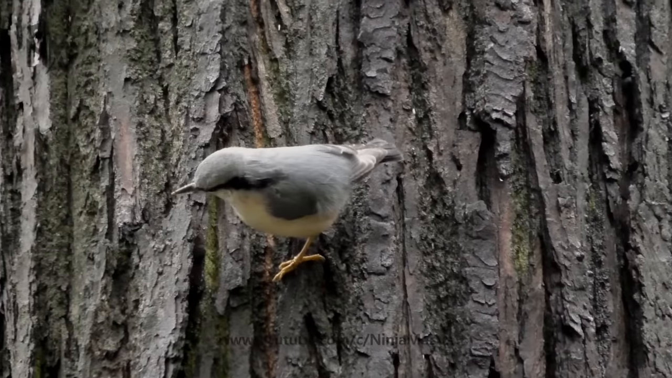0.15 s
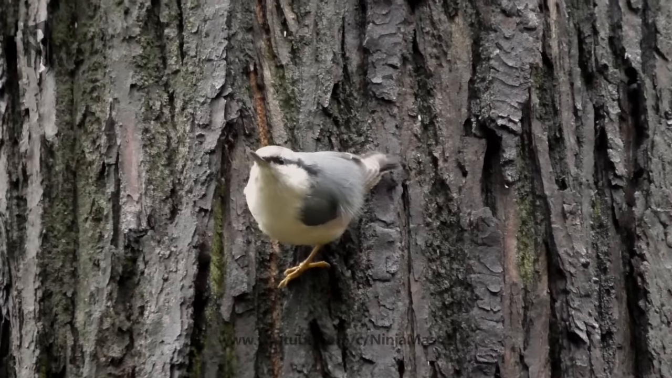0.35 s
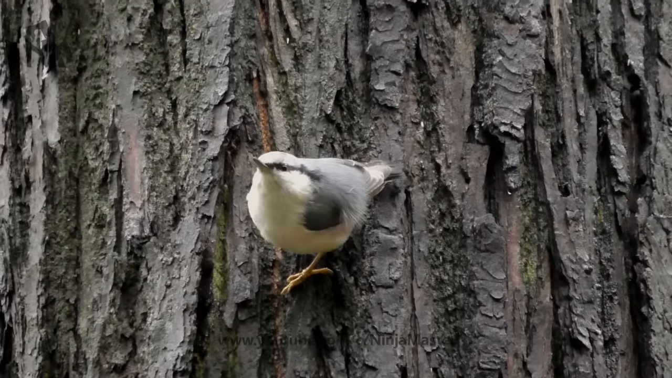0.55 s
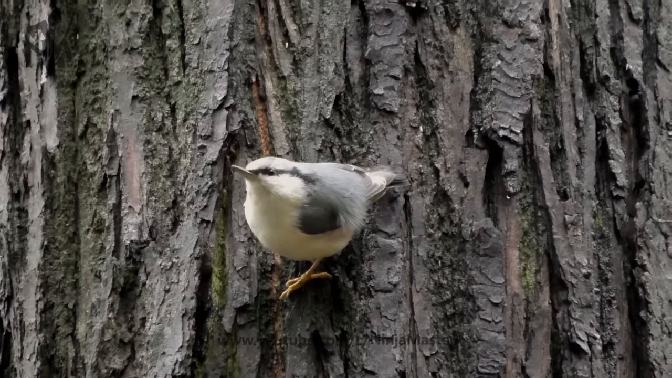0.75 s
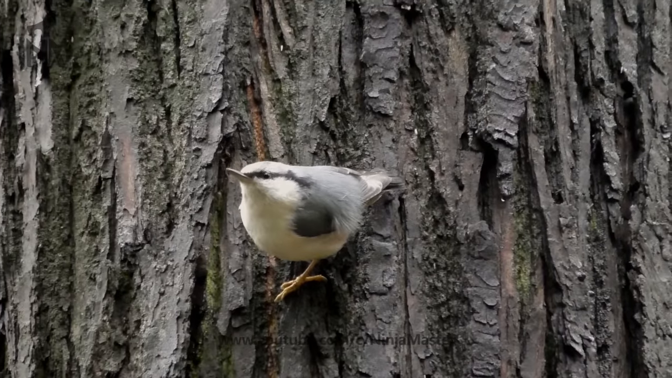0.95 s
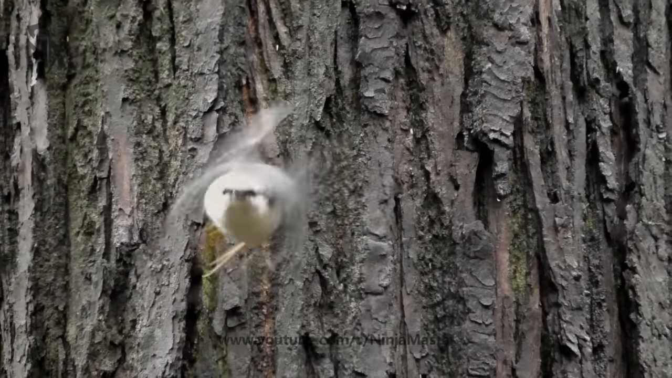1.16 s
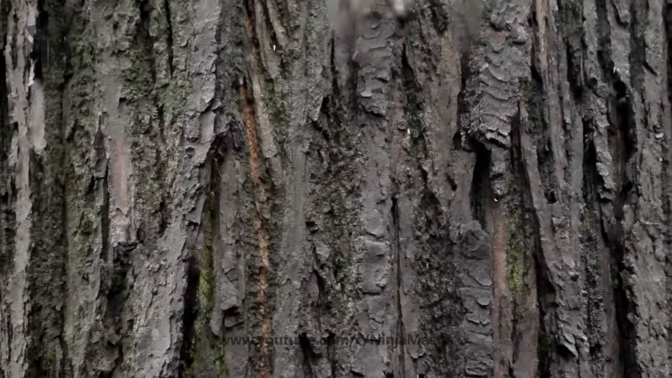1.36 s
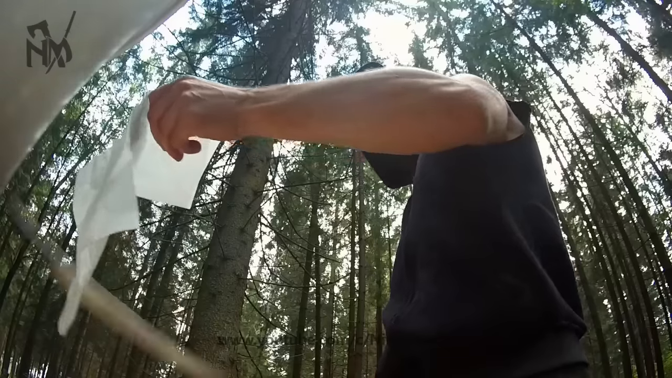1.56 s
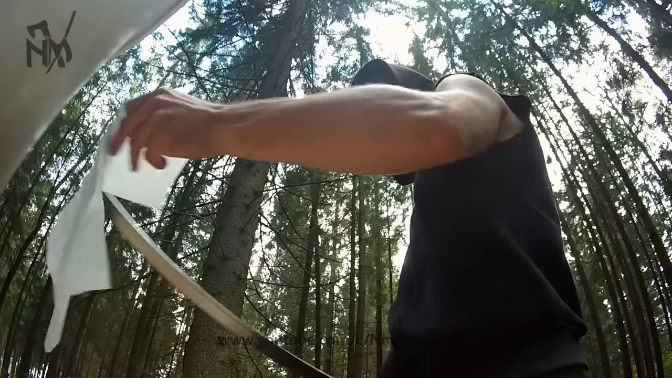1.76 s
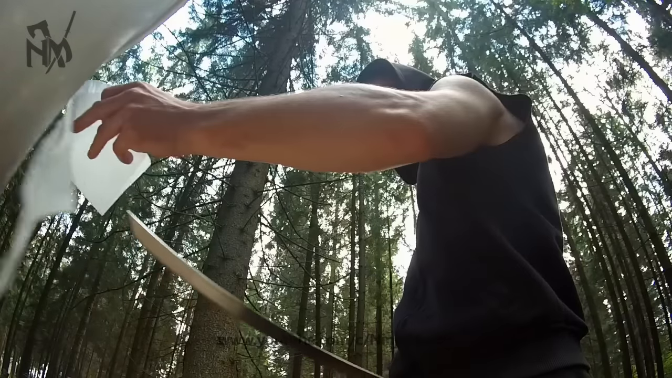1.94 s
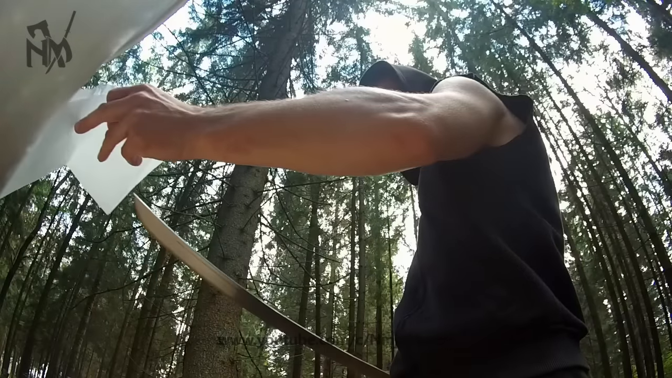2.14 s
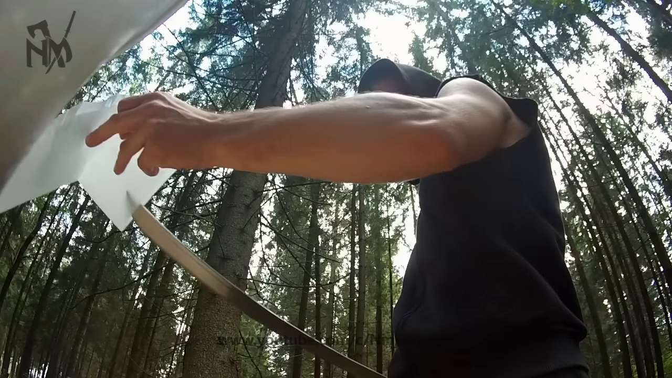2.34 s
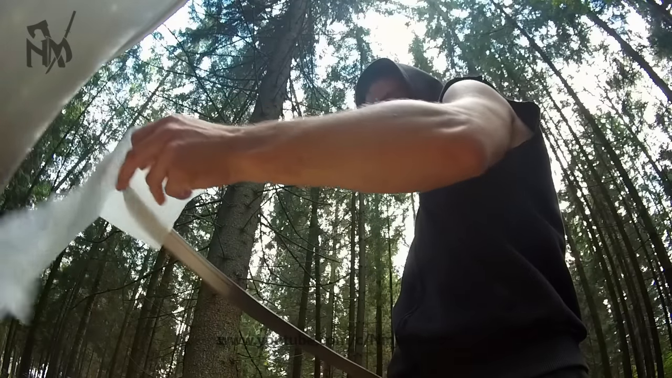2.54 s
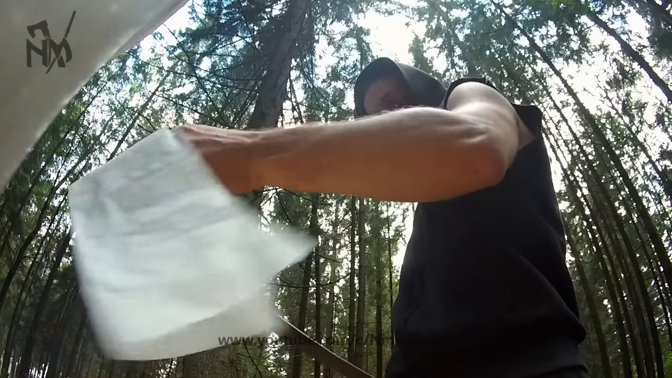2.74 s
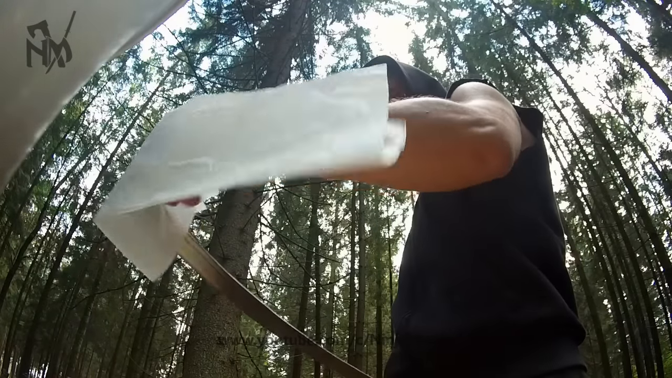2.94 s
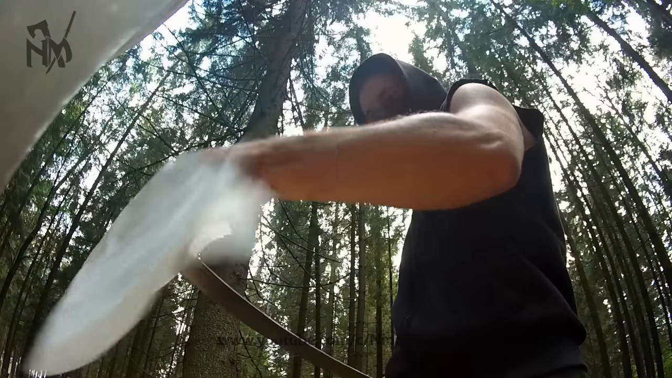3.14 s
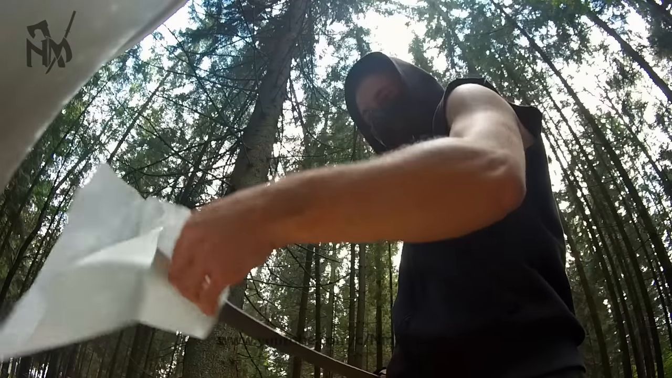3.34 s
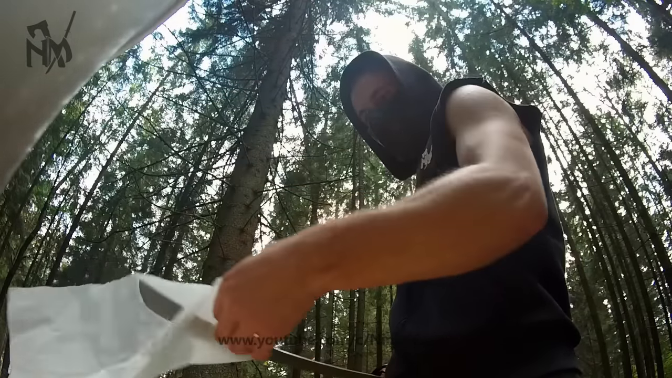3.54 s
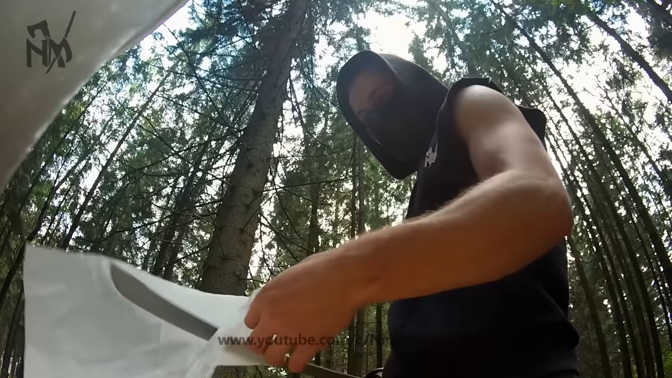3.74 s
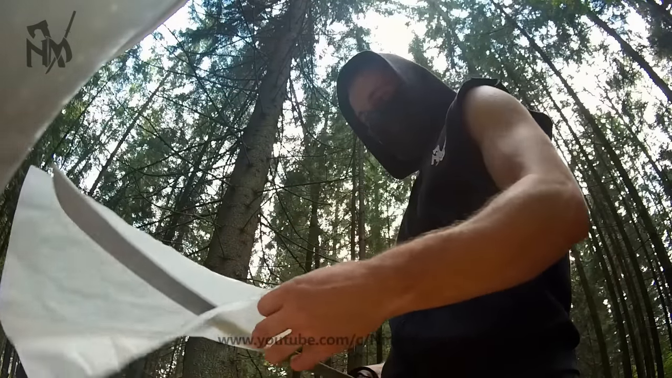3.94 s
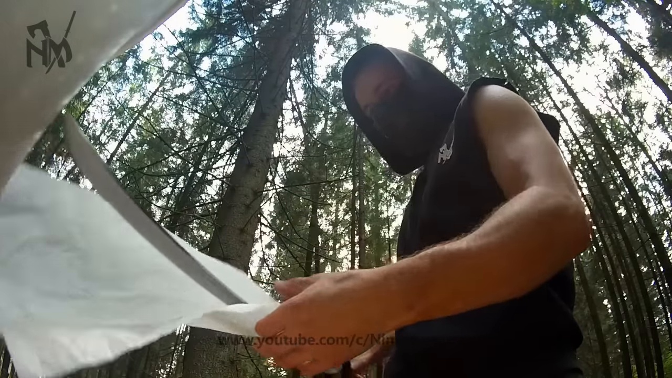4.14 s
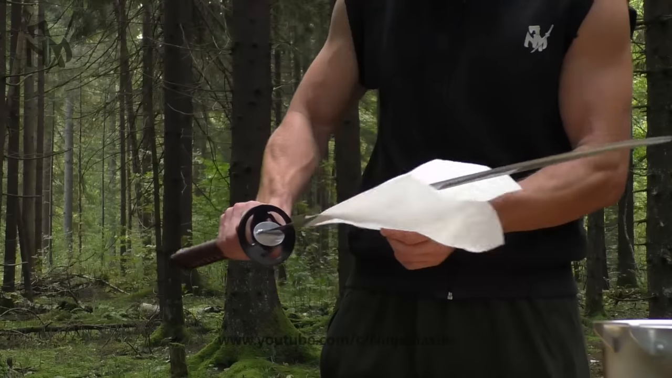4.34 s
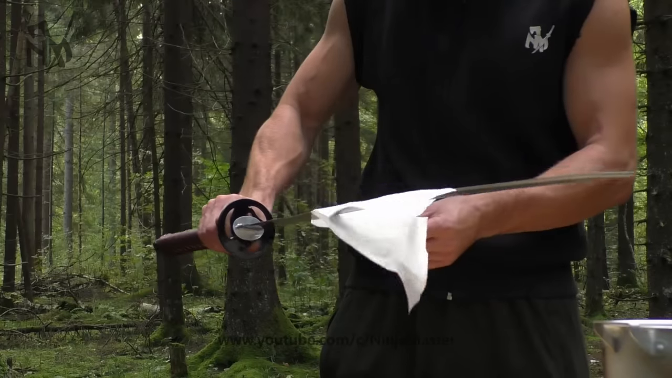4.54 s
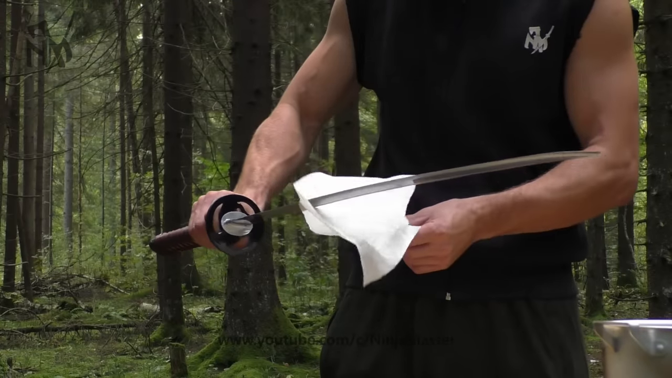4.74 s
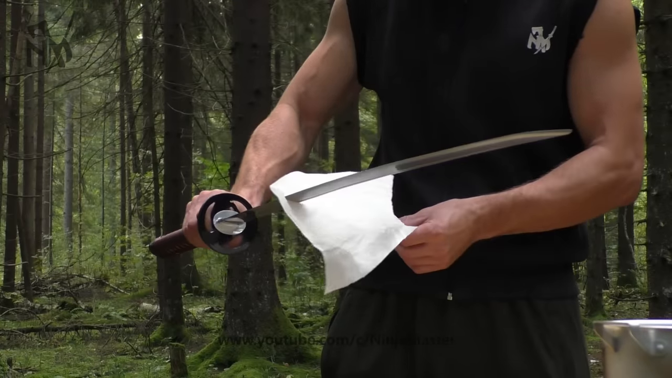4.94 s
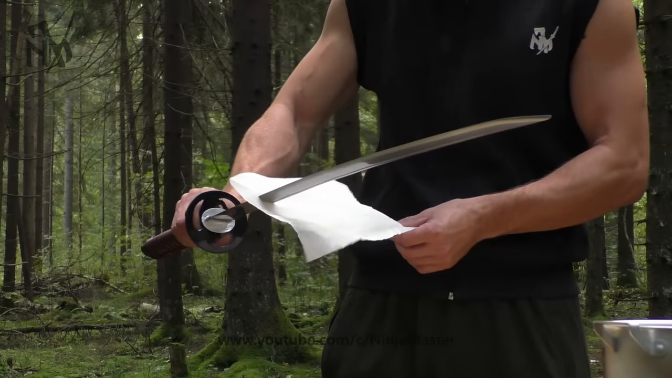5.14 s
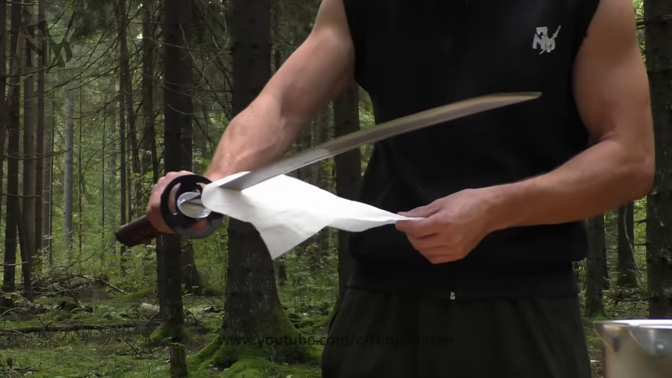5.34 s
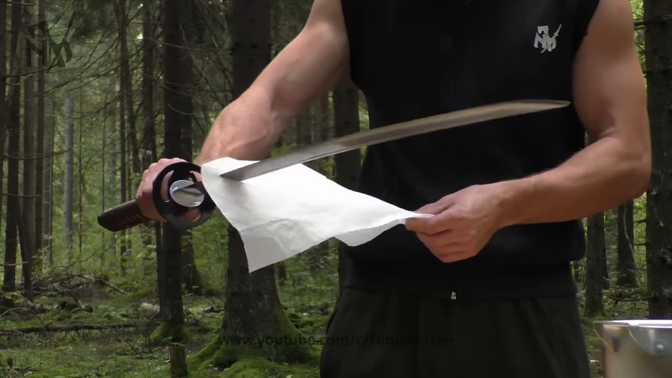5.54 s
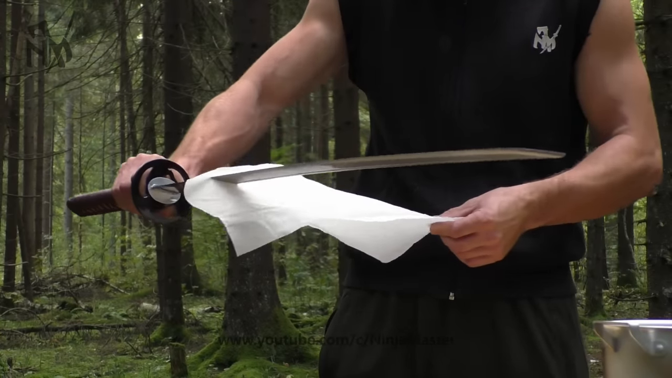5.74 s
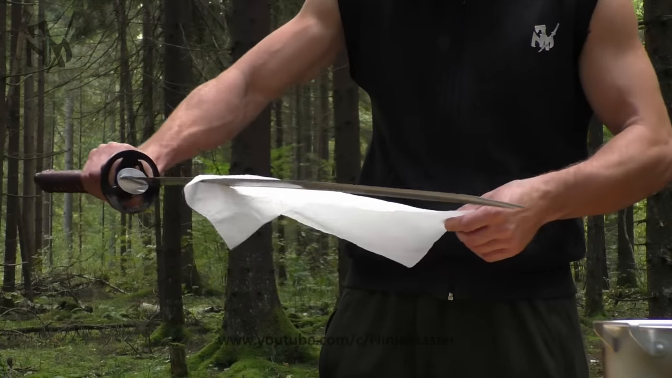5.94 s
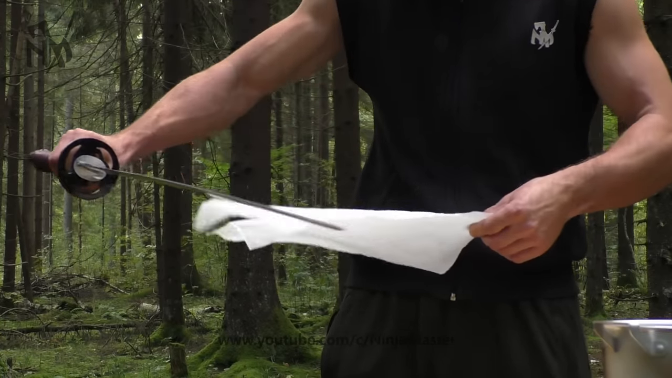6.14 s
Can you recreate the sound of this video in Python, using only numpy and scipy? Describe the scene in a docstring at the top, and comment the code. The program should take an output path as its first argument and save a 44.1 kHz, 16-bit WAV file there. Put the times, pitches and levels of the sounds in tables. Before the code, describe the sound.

Dry claw ticks and a quick flurry of wing claps in a birdsong-filled wood, followed by soft paper rustling, a rapid trill and crisp wiping strokes on a blade.

```python
"""A summer forest: insects sing one narrow band of noise over leaf rush and a blur of far birds.
First come rumble, hiss, sine-glide chirps and the dry snaps of a small bird scrabbling on bark;
it claps its wings as it flies off, each clap a noise burst, a puff and a low push of air.
Then low noise buffets mostly the right port, a blurred call holds its pitch, paper rustles in fits of noise,
whistles sink and a trill repeats; last, the paper is wiped along a steel blade as dense noise grains."""
import sys
import numpy as np
from scipy import signal
from scipy.fft import rfft, irfft, next_fast_len
from scipy.io import wavfile
from scipy.ndimage import uniform_filter1d, map_coordinates

SR = 44100
rng = np.random.default_rng(int(sys.argv[2]) if len(sys.argv) > 2 else 0)


def to_wav(s):
    """Save 16-bit WAV."""
    ch = np.atleast_2d(s).T  # columns
    pcm = np.round(np.clip(ch, -1, 1) * 32767)  # PCM
    wavfile.write(sys.argv[1], SR, pcm.astype(np.int16))


N = 277389

# Spectra list [f/Hz, density level/dB per Hz]; noise is later scaled as a whole, so only their shape counts.
# Levels of the forest over time: [t/s, leaf rush level/dB, far bird blur level/dB]
FOREST_LEVELS = [(0, -52, -49), (1.3, -53, -49), (2, -55.5, -49.5), (3, -53.5, -52), (3.7, -53.5, -49.5),
                 (4.5, -54.5, -53), (6.29, -54.5, -56)]
# Spectra of leaf rush, far bird blur and insect choir: [f/Hz, density level/dB per Hz]
LEAF_SPECTRUM = [(8.8, -53), (15, -10), (274, 1), (504, -5.5), (1610, -4), (2710, -54.5), (3520, -54),
                 (4320, -22.5), (4990, -14), (5940, -20), (8930, -30), (10000, -19.5), (10900, -30.5),
                 (15500, -30)]
BLUR_SPECTRUM = [(1200, -13), (1600, -7.5), (2000, -1.5), (2600, -0.5), (3300, -6), (4200, -8.5),
                 (4700, -8.5)]
INSECT_SPECTRUM = [(4550, -15), (4800, -4.5), (5050, 1.5), (5200, -7), (5400, -22)]
# Correlation of the leaf rush between left and right: [f/Hz, likeness/1]
LEAF_LIKENESS = [(60, 0.56), (240, 0.82), (950, 0.83), (2200, 0.34), (5000, 1), (15000, .96)]
# Reverberation among the trunks: [f/Hz, t60/s]
TRUNK_DECAY = [(300, 0.98), (2500, 0.98), (8000, 0.24), (15000, 0.28)]
INSECT_DB = -49.5

# Spectra of the opening rumble and hiss: [f/Hz, density level/dB per Hz]
RUMBLE_SPECTRUM = [(15, -40.5), (25, -20), (63, 1.5), (118, -0.5), (230, -7), (492, -20), (600, -20),
                   (780, -24), (1320, -120)]
HISS_SPECTRUM = [(3240, -23), (5500, -1), (6090, -5), (8370, -3.5), (9810, -9), (15800, -10.5)]
RUMBLE_DB, HISS_DB, HISS_SAG_DB_PER_S = -49.5, -55.5, 7.5  # the hiss sags from the start
LEAVE_S, RUMBLE_FADE_DB_PER_S, HISS_FADE_DB_PER_S = 1.423, 200, 150  # both fade from this time

# Single chirps: [t/s, length/s, start f/Hz, end f/Hz, level/dB]
CHIRP_GLIDES = [(.06, .07, 3320, 2170, -46), (0.062, 0.014, 2310, 1860, -46),
                (.115, 0.036, 8300, 7400, -53.5), (0.123, 0.019, 2430, 1830, -38.5),
                (0.139, .015, 3070, 2650, -45), (0.31, 0.072, 3150, 1876, -46),
                (.387, .028, 3040, 2600, -50), (.485, 0.025, 7800, 8350, -59),
                (.567, 0.027, 3510, 3480, -50), (0.627, 0.031, 4600, 3900, -53),
                (0.656, .022, 8050, 8500, -56), (.818, 0.025, 7850, 8640, -55),
                (0.838, 0.026, 3560, 3560, -48.5), (1.12, .033, 7900, 8100, -52),
                (1.412, .0084, 8300, 8560, -39), (1.421, .06, 3156, 2450, -46.5),
                (1.495, 0.036, 1928, 2072, -47), (1.656, 0.056, 3210, 2920, -51),
                (1.897, 0.038, 3500, 3220, -53), (2.527, .014, 2440, 2670, -44.5),
                (2.626, 0.023, 2100, 1820, -45), (2.637, 0.11, 1800, 1422, -55),
                (3.199, .075, 1800, 1507, -56.5), (3.11, 0.057, 4490, 4000, -52),
                (3.276, 0.071, 4320, 3740, -49.5), (3.305, 0.031, 3162, 3170, -52),
                (4.475, 0.0081, 1990, 2950, -38.5), (4.571, 0.018, 1445, 2940, -41.5),
                (4.621, 0.016, 2300, 2940, -45), (4.883, 0.013, 1720, 2930, -40),
                (5.036, 0.015, 1800, 2540, -55), (5.463, 0.14, 3245, 3040, -51.5),
                (5.474, 0.046, 2830, 2820, -49.5), (5.51, 0.092, 2603, 2233, -47),
                (5.629, 0.066, 2960, 2800, -53), (5.632, 0.032, 2410, 2260, -50),
                (6.244, 0.046, 2470, 2250, -47)]

# Dry ticks of claws, twigs and paper: [t/s, peak level before colouring/dB, left minus right/dB]
DRY_TICKS = [(.1151, -39, 0), (.3017, -36, -2.5), (.3785, -28, -3), (.6175, -42, -.5), (.6484, -29, -2.5),
             (1.6544, -41, 0), (1.711, -41, 0), (1.7634, -39, 0), (2.2308, -43, 0), (2.2857, -45, .5),
             (2.4394, -43, 0), (2.4947, -40, .5), (2.595, -38, .5), (2.7417, -44, .5), (3.7738, -42, 0),
             (4.1101, -38, 0), (4.6334, -30, 0), (4.6573, -26, -.5), (5.6151, -46, 0), (5.6694, -45, 0),
             (5.6825, -44, 0), (5.7894, -46, 0), (5.8666, -40, .5), (5.8895, -33, .5), (5.9064, -36, 1.5),
             (5.9389, -34, 1), (5.9668, -31, .5), (6.2562, -45, 0)]
SCRABBLE_DB = 8  # random ticks are louder while the bird is on the bark

# Wing claps: [t/s, burst peak level/dB, then relative to it: air push/dB, feather puff/dB (before
# the burst is scaled to its peak), crack of the tips/dB; snap t60/s]
WING_CLAPS = [(1.0813, -25, -10.5, 1, -18, .047), (1.1514, -11.5, -18, -37, 11, 0.022),
              (1.2258, -18.5, -17.5, -9, -22, 0.027), (1.3112, -17.5, -24, -13, 7, 0.051),
              (1.4032, -22, -20, -12, -22, 0.047), (1.479, -26.5, -14, -12.5, -10, .02)]
# Spectra of feather noise and of the air a wing shoves: [f/Hz, density level/dB per Hz]
FEATHER_SPECTRUM = [(410, -6), (700, -9.5), (921, -6), (3180, -7.5), (3440, -9), (4820, -9), (13500, -14),
                    (15800, -19.5)]
THUMP_SPECTRUM = [(120, -30), (240, -1.5), (380, 1), (650, -0.5), (1000, -22)]
PUFF_T60_S, PUSH_HZ, PUSH_T60_S = 0.11, 365, 0.16
THUMP_DB = -5  # relative to the pitched part of the push
# Feather noise between claps: hold times, level, rise and fall
FLUTTER_S, FLUTTER_DB, FLUTTER_EDGES_DB_PER_S = (1.118, 1.418), -44, (204, 74)

# Wind on the ports: [t/s, level/dB]
BUFFET_LEVELS = [(1.36, -56), (1.42, -45.5), (2.66, -45.5), (2.72, -46), (2.74, -48.5), (3.38, -58),
                 (3.58, -58), (3.64, -45.5), (3.92, -53.5), (3.98, -44), (4.12, -56), (4.14, -41),
                 (4.23, -45), (4.3, -83)]
# Spectrum of the wind: [f/Hz, density level/dB per Hz]
GUST_SPECTRUM = [(7.1, -54), (12, 6.5), (43, 1), (61, -10), (81, -34.5), (110, -58), (140, -55),
                 (240, -120)]
BUFFET_PAN_DB = -12  # left minus right

HELD_S, HELD_HZ, HELD_DB = (1.5, 2.95), 1965, -55  # a far, blurred call

# Fits of rustling as the paper is unfolded and turned in the hand: [t/s, level/dB]
RUSTLE_FITS = [(1.86, -59), (2.35, -62), (2.6, -50.5), (2.86, -51), (3.2, -55), (3.4, -50.5), (3.8, -52),
               (3.95, -55), (4.18, -58)]
# Spectrum of the rustle: [f/Hz, density level/dB per Hz]
RUSTLE_SPECTRUM = [(1800, -16), (2600, -10.5), (4200, -0.5), (6000, -4), (7500, -21.5), (9000, -35)]
FIT_EDGES_DB_PER_S = (184, 116)  # rise and fall

# Sinking whistles: [start t/s, start f/Hz, beads as [t/s, length/s, level/dB]]
BEADED_WHISTLES = [(1.978, 2650, [(1.985, .075, -47.5), (2.099, 0.077, -42.5), (2.19, 0.12, -48.5),
                   (2.3, .06, -50), (2.38, 0.15, -51.5)]), (5.714, 2690, [(5.707, 0.06, -51),
                   (5.746, 0.028, -41.5), (5.789, 0.024, -38.5), (5.843, 0.066, -39.5),
                   (5.94, 0.041, -44.5), (5.989, 0.021, -39), (6.035, .09, -47), (6.133, 0.05, -48),
                   (6.201, .053, -48.5)])]
SAG_HZ_PER_S = 800

# Overlapping glides of one trill note: [delay/s, length/s, start f/Hz, end f/Hz, relative level/dB]
NOTE_PARTS = [(0, .011, 2480, 2820, 0), (0, .014, 2380, 1880, -4), (.01, .014, 2755, 2600, -14),
              (.024, .016, 2050, 2780, -6), (.041, .012, 2750, 2600, -15)]
TRILL_S, NOTE_GAP_S, NOTES = 3.4195, .069, 17  # first note, spacing, count
TRILL_DB, TRILL_ENDS_DB = -35, 5.5  # level mid-phrase; how much softer the first and last notes are

# Strokes of paper on steel, one list per stroke: [t/s, hiss level/dB]
WIPE_STROKES = [
    [(4.3, -60), (4.312, -84), (4.352, -48.5), (4.456, -32.5), (4.478, -40), (4.488, -33), (4.504, -39),
     (4.518, -54), (4.56, -73)],
    [(4.58, -83), (4.638, -36), (4.648, -50), (4.658, -33), (4.672, -39), (4.894, -44.5), (4.916, -48.5),
     (4.97, -54)],
    [(4.97, -56.5), (5.064, -43.5), (5.18, -47), (5.184, -52), (5.214, -42), (5.234, -52), (5.266, -32),
     (5.356, -38), (5.42, -73)],
    [(5.84, -66), (5.898, -46), (5.998, -39), (6.006, -34), (6.026, -37), (6.038, -33.5), (6.116, -38),
     (6.126, -57), (6.16, -66)],
]
# Scrape of the pressed fold at the reference hiss, one per stroke: [level/dB]
STROKE_SCRAPE_DB = [-51, -44.5, -44.5, -41.5]
# The paper snags and the sound dips: [t/s, depth/dB]
SNAG_DIPS = [(4.475, 6), (5.184, 9), (5.338, 9), (5.378, 10), (5.882, 17), (5.9, 5), (5.917, 6), (5.93, 16),
             (5.99, 8), (6.061, 1)]
# Spectra of sliding paper and of its pressed fold: [f/Hz, density level/dB per Hz]
PAPER_SPECTRUM = [(1760, -38), (3000, -9), (4650, -27), (4950, -23), (5340, -10), (8630, -0.5), (10400, 1),
                  (13100, -1), (15800, -8)]
FOLD_SPECTRUM = [(590, -25), (1000, -16.5), (1370, -9), (1650, -12), (2230, -1.5), (2440, -5), (2630, -1),
                 (6000, -6), (7800, -11), (13200, -120)]
SCRAPE_GROWS, REFERENCE_DB = 1.02, -42  # dB of scrape per dB of hiss; reference hiss level

TOP_HZ = 15900


def amp(db):
    """Definition of level: the gain of a value in dB."""
    return 10 ** (np.asarray(db) / 20)


def unit(x):
    """Normalization by power: scaled to rms 1."""
    return x / np.sqrt(np.mean(x ** 2) + 1e-20)


def along(points, hz):
    """Logarithmic frequency scale: interpolates (f, value) points."""
    f, v = np.transpose(points)
    return np.interp(np.log(hz + 1), np.log(f + 1), v)


def curves(rows):
    """Piecewise-linear envelopes: one per column, then a gate that is open inside the table's span."""
    s, *cols = np.transpose(rows)
    t = np.arange(N) / SR
    inside = 1. * (t >= s[0]) * (t <= s[-1])
    gate = uniform_filter1d(inside, size=400)
    return [np.interp(t, s, c) for c in cols] + [gate]


def held(start, end, rise, fall):
    """Trapezoidal level: 0 dB from start to end, with straight slopes in dB per s outside."""
    t = np.arange(N) / SR
    return -rise * np.maximum(start - t, 0) - fall * np.maximum(t - end, 0)


def wobble(rate, size=N):
    """Slow random modulation: a smooth curve with rate knots a second."""
    knots = rng.standard_normal(int(size * rate / SR) + 4)
    return map_coordinates(knots, [np.arange(size) * rate / SR])


def filtered(x, response):
    """Linear filtering: the spectrum of x times a response of frequency."""
    n = x.shape[-1]
    m = next_fast_len(n + 8192)
    return irfft(rfft(x, m) * response(np.fft.rfftfreq(m, 1 / SR)), m)[..., :n]


def shape(points):
    """Band limitation: the gain of a spectrum that is silent outside its points."""
    return lambda hz: amp(along(points, hz)) * (hz > points[0][0]) * (hz < points[-1][0])


def rush(spectrum, alike, patchy_db, grains=1):
    """Partially coherent noise: a stereo pair of rms 1 with time-frequency patches of random gain."""
    z = signal.stft(rng.standard_normal((2, N)) * grains, nperseg=512)[2]
    field = uniform_filter1d(rng.standard_normal(z.shape[1:]), size=6, axis=0)
    field = uniform_filter1d(field, size=8, axis=1)
    pair = signal.istft(z * amp(patchy_db * unit(field)), nperseg=512)[1][:, :N]

    def mid_side_gains(hz):
        # half the angle whose cosine is the wanted correlation
        turn = np.arccos(np.clip(along(alike, hz), -1, 1)) / 2
        return shape(spectrum)(hz) * [np.cos(turn), np.sin(turn)]

    mid, side = filtered(pair, mid_side_gains)
    return unit(np.array([mid + side, mid - side]))


def add(track, s, sound):
    """Superposition: mixes a sound in at time s."""
    part = track[..., round(s * SR):][..., :sound.shape[-1]]
    part += sound[..., :part.shape[-1]]


def sine(hz):
    """Frequency as rate of phase: a complex tone, rms 1 in its real part, follows a pitch per sample."""
    return np.sqrt(2) * np.exp(2j * np.pi * np.cumsum(hz) / SR)


def glide(track, s, length, start_hz, end_hz, db):
    """Linear frequency sweep: sings one straight glide under a rounded envelope."""
    n = round(length * SR)
    add(track, s, amp(db) * np.hanning(n) ** 0.29 * sine(np.linspace(start_hz, end_hz, n)))


def scattered(song, share, rate):
    """Multipath scattering by moving leaves: a random complex gain roughens every tone."""
    return (song * (1 + share * (wobble(rate) + 1j * wobble(rate)))).real


def trunks(x, spread):
    """Reverberation off the trees: a noise tail decays at its own speed at each frequency."""
    hz, t, z = signal.stft(rng.standard_normal((2, SR // 2)), SR, nperseg=256)
    decay = amp(-60 * t / along(TRUNK_DECAY, hz)[:, None])
    mid, side = signal.istft(z * decay, SR, nperseg=256)[1]
    tail = np.array([mid + spread * side, mid - spread * side]) / np.linalg.norm(mid)
    delayed = np.pad(x, (200, 0))[None]
    return signal.fftconvolve(delayed, tail, axes=1)[:, :N]


def far_birds():
    """Superposed random sweeps: short glides scattered by leaves and echoed by the trees."""
    out = np.zeros(N, complex)
    for when, length, pitch, bend, size in rng.random((260, 5)):
        hz = 1700 * np.exp(.9 * pitch ** 1.5)
        glide(out, when * N / SR, 0.0123 + 0.0397 * length, hz, hz * (1.1 - 0.2876 * bend), -12 * size)
    out = scattered(out, 0.67, 120)
    return unit(amp(-2.5) * out + trunks(out, spread=0.092))


def forest():
    """Incoherent sources and quadratic distortion: leaves, far birds, and insects with a weak octave."""
    rush_db, blur_db, _ = curves(FOREST_LEVELS)
    leaves = amp(rush_db + .7 * wobble(6)) * rush(LEAF_SPECTRUM, LEAF_LIKENESS, patchy_db=1.2)
    blur = amp(1.24 * wobble(12)) * rush(BLUR_SPECTRUM, [(1300, 0.99), (2200, 0.94)], patchy_db=3.0)
    blur = amp(blur_db) * (blur + amp(-5) * far_birds())
    choir = rush(INSECT_SPECTRUM, [(5000, 1.0)], patchy_db=1.2)
    octave = unit(filtered(choir ** 2, lambda hz: hz > 6000))  # a lopsided vibration doubles the band
    return leaves + blur + amp(INSECT_DB) * (choir + amp(-32.0) * octave)


def rumble_and_hiss():
    """Filtered noise: low and high bands that fade out together, the hiss already sagging."""
    rumble_db = RUMBLE_DB + held(0, LEAVE_S, 0, RUMBLE_FADE_DB_PER_S)
    hiss_db = HISS_DB + held(0, 0, 0, HISS_SAG_DB_PER_S) + held(0, LEAVE_S, 0, HISS_FADE_DB_PER_S)
    rumble = rush(RUMBLE_SPECTRUM, [(100, 0.99)], patchy_db=-1.0)
    hiss = rush(HISS_SPECTRUM, [(6000, 0.86), (15000, 0.092)], patchy_db=1.5)
    return amp(rumble_db) * rumble + amp(hiss_db) * hiss


def chirps():
    """Frequency modulation: single sine glides roughened by scattering."""
    out = np.zeros(N, complex)
    for row in CHIRP_GLIDES:
        glide(out, *row)
    return scattered(out, .5, 220)


def ticks():
    """Impulsive excitation: tiny noise snaps die within milliseconds; fainter ones fall at random."""
    out, t = np.zeros((2, N)), np.arange(SR // 50) / SR
    faint = rng.random((60, 3)) * [N / SR, -9, 6] + [0, -44, -3]  # columns as in DRY_TICKS
    faint[:, 1] += SCRABBLE_DB * (faint[:, 0] < FLUTTER_S[0])
    for s, db, pan_db in [*DRY_TICKS, *faint]:
        same, own = rng.standard_normal((2, len(t)))
        # the ports hear slightly different snaps
        snap = amp(-60 * t / 0.008) * (same + [[.4], [-.4]] * own)
        add(out, s, amp(db + np.array([[.5], [-.5]]) * pan_db) * snap / np.abs(snap).max())
    return filtered(out, shape([(1800, -20), (3200, 2), (6000, 4), (9000, -1), (15800, -8)]))


def wings():
    """Impact and displaced air: a ragged burst as feathers meet, a longer puff, a low push, a crack."""
    out, t = np.zeros(N), np.arange(SR // 4) / SR
    push_decay = amp(-60 * t / PUSH_T60_S)
    for s, db, push_db, puff_db, crack_db, snap_t60 in WING_CLAPS:
        ragged = amp(4.5 * wobble(1500, size=len(t)))
        onset = (t / 0.0021) ** 2 / (1 + (t / 0.0013) ** 2)
        snap = onset * amp(-60 * t / snap_t60) * ragged
        puff = amp(puff_db - 60 * t / PUFF_T60_S)
        burst = filtered((snap + puff) * rng.standard_normal(len(t)), shape(FEATHER_SPECTRUM))
        unsteady_phase = 2 * np.pi * PUSH_HZ * t + 4.35 * wobble(70, size=len(t))
        push = np.sin(unsteady_phase) * push_decay * (1 - np.exp(-t / 0.0034))
        thump = unit(filtered(rng.standard_normal(len(t)), shape(THUMP_SPECTRUM)))
        push += amp(THUMP_DB) * thump * push_decay * (1 - np.exp(-t / 0.0014))
        add(out, s, amp(db) * (burst / np.abs(burst).max() + amp(push_db) * push))
        brief = t[:40]
        crack = amp(db + crack_db - 60 * brief / .001) * np.cos(2 * np.pi * 4500 * brief + .6)
        add(out, s + .0016, crack)
    return out


def flutter():
    """Amplitude-modulated noise: feathers sound unevenly between the claps."""
    level_db = FLUTTER_DB + held(*FLUTTER_S, *FLUTTER_EDGES_DB_PER_S) + 2.7 * wobble(39.93)
    return amp(level_db) * rush(FEATHER_SPECTRUM, [(3000, 0.59)], patchy_db=0.0)


def buffeting():
    """Local turbulence: low wind noise, almost unrelated between the ports, swells in lumps."""
    buffet_db, windy = curves(BUFFET_LEVELS)
    pan_db = np.array([[.5], [-.5]]) * BUFFET_PAN_DB
    lumps = amp(1.4 * np.array([wobble(7), wobble(8.16)]) + pan_db)
    gusts = unit(lumps * rush(GUST_SPECTRUM, [(40, .02)], patchy_db=-2.0))
    return windy * amp(buffet_db) * gusts


def held_call():
    """Strong multipath scattering: a wavering sine around one pitch is blurred into a band."""
    waver = amp(held(*HELD_S, 400, 400) + 4 * wobble(25)) * sine(HELD_HZ + 50 * wobble(15))
    call = scattered(waver, 2.5, 260) / np.sqrt(1 + 2 * 2.5 ** 2)  # offsets the gain of scattering
    return amp(HELD_DB) * call


def handling():
    """Random crumpling: soft paper rustles as wide noise in short fits."""
    level = sum(amp(db + held(s, s, *FIT_EDGES_DB_PER_S)) for s, db in RUSTLE_FITS)
    crumple = amp(3.5 * wobble(50) + 3.5 * wobble(700))
    return level * crumple * rush(RUSTLE_SPECTRUM, [(6000, 0.07)], patchy_db=3.5)


def whistles():
    """Falling frequency under a broken envelope: beads lie along one sinking line."""
    out = np.zeros(N, complex)
    for start, top_hz, beads in BEADED_WHISTLES:
        for s, length, db in beads:
            hz = top_hz - SAG_HZ_PER_S * (s - start)
            glide(out, s, length, hz, hz - SAG_HZ_PER_S * length, db)
    return scattered(out, .4, 120)


def trill():
    """Periodic repetition: a note of overlapping glides returns evenly, slightly varied in pitch and level."""
    out = np.zeros(N, complex)
    for k in range(NOTES):
        note_s = TRILL_S + k * NOTE_GAP_S
        note_db = TRILL_DB - TRILL_ENDS_DB * (2 * k / (NOTES - 1) - 1) ** 4
        for delay, length, start_hz, end_hz, part_db in NOTE_PARTS:
            tune = rng.normal(1, 0.014)
            db = note_db + part_db + rng.normal(0, 1.4)
            glide(out, note_s + delay, length, start_hz * tune, end_hz * tune, db)
    return scattered(out, .18, 250)


def wiping():
    """Friction: paper fibres slip over the edge as dense grains; pressing harder adds a lower scrape."""
    grains = amp(3.5 * wobble(1500) + 2.4 * wobble(55) + 1.5 * wobble(250))
    t = np.arange(N) / SR
    snags = amp(-sum(db * np.exp(-((t - s) / 0.004) ** 2) for s, db in SNAG_DIPS))
    hiss = rush(PAPER_SPECTRUM, [(3000, 0.14), (15000, 0.036)], patchy_db=4.0, grains=grains)
    scrape = rush(FOLD_SPECTRUM, [(3000, 0.08)], patchy_db=4.5, grains=grains)
    out = np.zeros((2, N))
    for rows, reference_scrape_db in zip(WIPE_STROKES, STROKE_SCRAPE_DB):
        hiss_db, on = curves(rows)
        scrape_db = reference_scrape_db + SCRAPE_GROWS * (hiss_db - REFERENCE_DB)
        out += on * snags * (amp(hiss_db) * hiss + amp(scrape_db) * scrape)
    return out


def scene():
    """Direct and reverberant sound: birdsong and claps also echo, other near sounds stay dry."""
    background = forest() + rumble_and_hiss() + buffeting()
    song = chirps() + held_call() + whistles() + trill()
    claps = wings()
    flight = claps * amp([[.6], [-.6]]) + trunks(amp(-12.5) * claps, spread=0.69) + flutter()
    near = flight + ticks() + handling() + wiping()
    return background + near + song + trunks(amp(-7) * song, spread=0.011)


def record(dry):
    """Low-pass filtering: nothing passes above the band limit."""
    return filtered(dry, lambda hz: hz < TOP_HZ)


dry = scene()
out = record(dry)
to_wav(out)
```